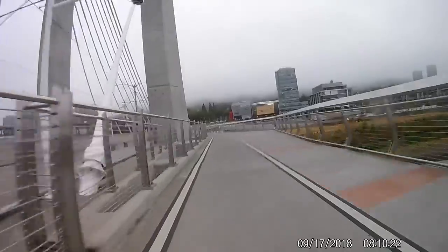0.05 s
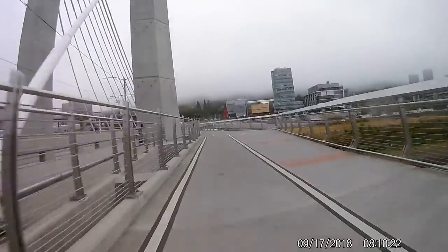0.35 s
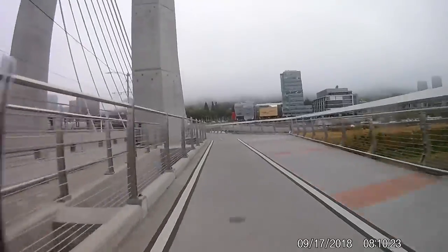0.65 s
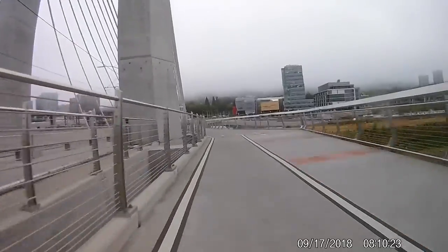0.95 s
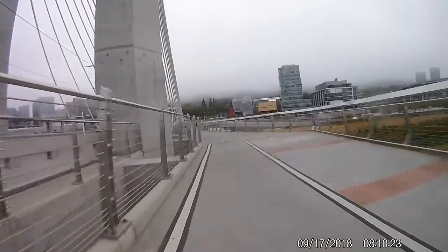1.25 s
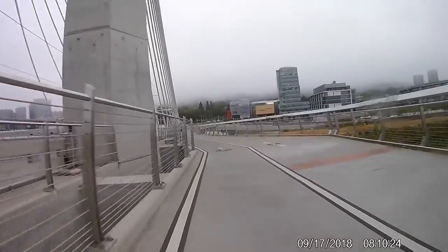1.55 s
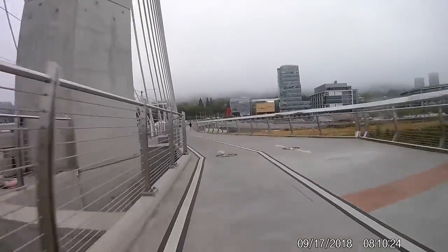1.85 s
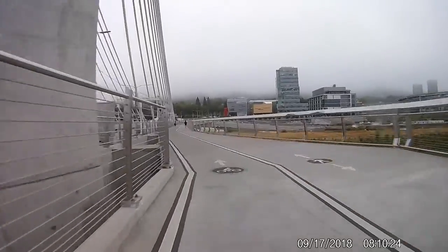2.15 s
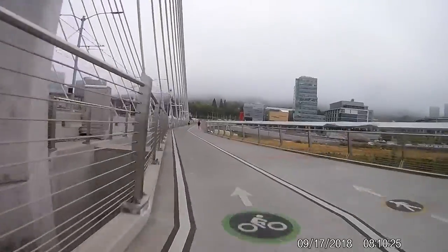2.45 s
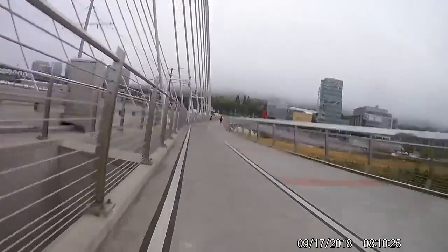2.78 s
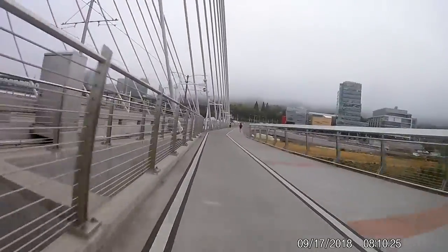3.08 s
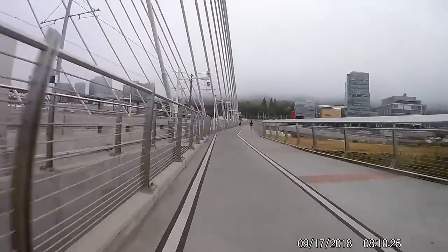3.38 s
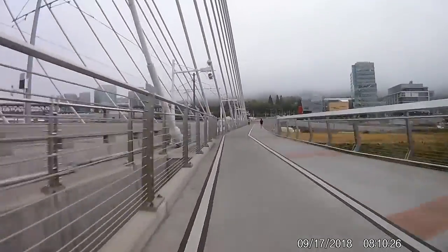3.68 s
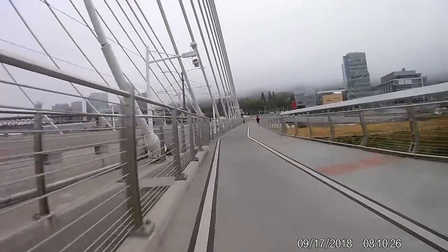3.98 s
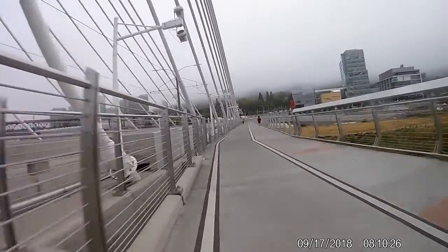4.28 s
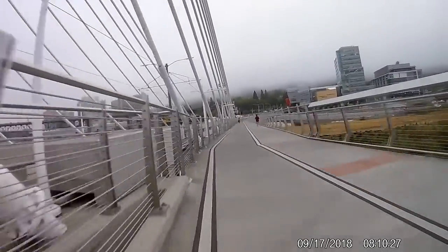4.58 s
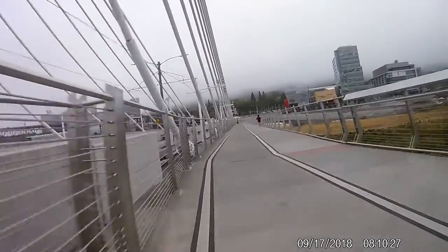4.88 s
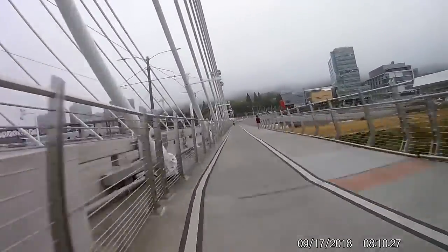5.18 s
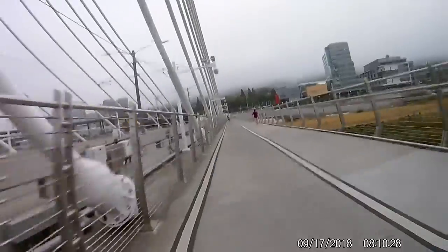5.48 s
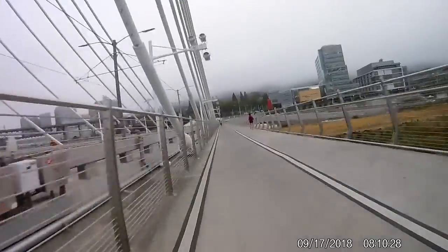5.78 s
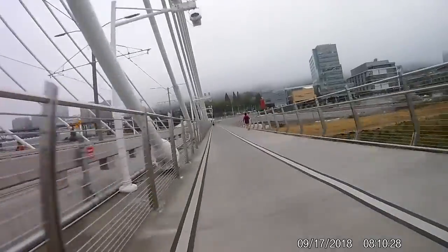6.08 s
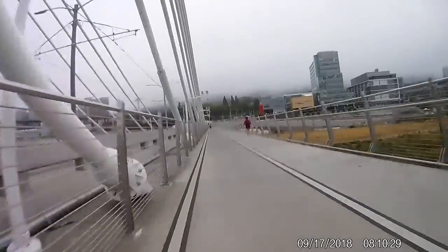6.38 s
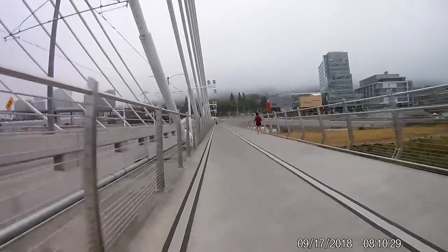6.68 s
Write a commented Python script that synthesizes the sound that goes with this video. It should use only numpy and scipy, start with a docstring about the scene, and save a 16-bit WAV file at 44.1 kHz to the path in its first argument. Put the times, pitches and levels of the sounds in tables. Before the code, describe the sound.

A bicycle rolls along a concrete path, its mounted camera clacking and thumping in bursts over a low tyre rumble.

```python
"""Clacks and thumps over tyre noise: a bicycle on a concrete path, with a camera in a plastic handlebar case.
Bumps sway the mount at about 37 Hz; on wide swings the camera hits its stops, a clack one way,
a thump the other. Tyre noise comes through frame and case; loose metal parts jingle.
Short gritty bursts and two brief high tones join in. The hardest blows overload the microphone."""
import sys
import numpy as np
from scipy import signal
from scipy.fft import rfft, irfft
from scipy.io import wavfile
from scipy.ndimage import uniform_filter1d

SR = 44100
rng = np.random.default_rng(int(sys.argv[2]) if len(sys.argv) > 2 else 0)


def unload_audio(sound):
    """Save the sound as a 16-bit wav file, at the path given as the first command line argument."""
    columns = np.transpose(np.atleast_2d(sound))
    # keep every value between -1 and 1, then stretch to whole-number steps
    steps = np.round(np.clip(columns, -1, 1) * 32767)
    wavfile.write(sys.argv[1], SR, steps.astype(np.int16))


N = 301644
TIME_S = np.arange(N) / SR
SWAY_HZ = 37.42
GRAZE_TICK_DB, GRAZE_CLACK_DB, GRAZE_THUMP_DB = -20, -17.5, -26.5
SPREAD_DB = 3  # blow-to-blow colour variation

# Levels are relative; each source adds its own offset.
# rolling (time [s], tyre noise [dB], tread drone [dB])
ROLL_LEVELS = [(0.0, -44, -47), (0.32, -45, -41.5), (2.23, -44, -47), (2.82, -43.5, -32.5), (4.1, -44, -43),
               (4.86, -42.5, -36.5), (5.35, -37.5, -41.5), (6.1, -42, -34), (6.51, -41.5, -36),
               (6.84, -40, -40.5)]
# tread drone (time [s], pitch [Hz])
TREAD_PITCH = [(0, 353.6), (2.6, 376.4), (3.6, 382.3), (4.6, 392), (5.2, 411), (6.84, 384.3)]
# tyre noise through the frame (frequency [Hz], level [dB])
TYRE_SPECTRUM = [(20, -19.5), (70, 8.5), (130, -7.5), (240, -1.5), (330, 4), (480, 6.5), (750, -5),
                 (1230, -8), (1650, -2.5), (1900, -16.5), (3000, -22.5), (4500, -38), (7500, -50.5),
                 (16000, -58)]
# frame resonances (centre [Hz], width [Hz], boost [dB])
FRAME_RESONANCES = [(296.5, 44, 10.2), (925, 58, 7.3), (1092, 74, 10.3), (1444, 230, 8.1), (2038, 110, 11),
                    (2784, 120, 7.7), (3770, 110, 3.6)]
# faint squeaks (time [s], level [dB])
SQUEAK_EVENTS = [(1.72, -29), (2.204, -30), (3.473, -28.5)]
# loose parts jolted (time [s], level [dB])
JINGLE_EVENTS = [(0.292, -39), (0.513, -42), (0.668, -39), (0.956, -47.5), (1.251, -44), (1.625, -48),
                 (1.723, -44), (2.336, -40), (2.693, -44), (3.389, -43.5), (4.254, -49), (5.206, -42)]
# loose parts ringing (frequency [Hz], level [dB], t60 [s])
METAL_MODES = [(2780, -5.5, .03), (3700, 3, 0.047)]
# brief high tones (time [s], pitch [Hz], overtone [Hz], level [dB])
HIGH_TONES = [(6.384, 4180, 6300, -36), (6.492, 4180, 6640, -35)]
# short gritty noise bursts (time [s], level [dB])
GRIT_BURSTS = [(1.914, -40), (2.876, -27), (3.484, -36), (5.208, -28.5), (5.937, -22.5), (6.389, -13),
               (6.491, -11)]
# case ringing (frequency [Hz], level [dB], t60 [s])
CASE_MODES = [(350, -19, 0.0095), (744, -2, 0.08), (822, 6, 0.041), (1140, -5.5, 0.039),
              (1436, -4.5, 0.037), (1738, -1, 0.034), (1730, -8.5, 0.056)]
# edge contact (frequency [Hz], level [dB])
TICK_SPECTRUM = [(200, -2.5), (900, 9), (1600, 8), (2500, -2.5), (3500, 2), (4300, -2.5), (5000, -14),
                 (6600, -17.5), (7900, -45.5), (9200, -26), (11500, -31.5), (13200, -50), (15500, -67.5)]
# camera seating (frequency [Hz], level [dB])
SEAT_SPECTRUM = [(40, -7), (250, -1), (450, -1.5), (750, 0.5), (1100, -10.5), (1700, -8.5), (2500, -31),
                 (5000, -68.5), (16000, -74.5)]
# full-weight landing (frequency [Hz], level [dB])
THUD_SPECTRUM = [(40, 4.5), (120, -4), (380, -4), (700, -2), (900, -3), (1300, -10.5), (2000, -23),
                 (3000, -48), (6000, -53), (16000, -88.5)]
# bumps that only rock the mount (time [s], sway [dB])
SWAY_BUMPS = [(0.3, -27), (0.84, -17.5), (1.48, -22.5), (1.921, -19), (2.4, -22), (3.0, -19), (3.12, -24),
              (3.44, -22.5), (3.89, -26), (4.081, -24), (4.56, -27), (4.67, -19.5), (6.148, -18),
              (6.288, -15.5), (6.68, -15), (6.799, -13.5)]
# jolts that throw the camera against its stops (time [s], first stop [hard/soft], blows [count],
# swing [Hz], sway [dB], tick [dB], clack [dB], thump [dB])
STOP_JOLTS = [(0.057, "hard", 3, 33.6, -16, -16.5, -11, 0),
              (0.2053, "hard", 1, 36.9, -19.5, -26.5, -13.5, -22),
              (0.546, "hard", 1, 35.35, -14, -25, -14, -13),
              (0.5762, "hard", 3, 33.4, -12.5, -16.5, -9, -13.5),
              (1.11, "hard", 5, 35, -18.5, -40, -28, -35),
              (1.3107, "hard", 3, 37.3, -13, -16.5, -11.5, -19),
              (2.2839, "soft", 2, 41.2, -19, -17, -8, -20.5),
              (2.7537, "hard", 1, 34.8, -17, -23.5, -18.5, -5),
              (2.8093, "hard", 1, 38.8, -12, -18.5, -12, -3),
              (2.8624, "hard", 1, 34.8, -17, -17.5, -12, -14),
              (2.9053, "soft", 2, 40.84, -13.5, -10.5, -5.5, -10),
              (3.544, "hard", 1, 37.2, -16.5, -37.5, -21, -17),
              (3.6223, "hard", 3, 35.05, -14, -17, -9.5, -18.5),
              (3.7297, "hard", 1, 36.3, -18, -34, -22, -14), (4.817, "hard", 1, 37.8, -15.5, -34, -26, -17),
              (4.895, "hard", 1, 39.25, -14, -16, -7.5, -8), (4.9937, "hard", 3, 35.07, -15, -14, -7.5, -8),
              (5.0984, "hard", 1, 34.1, -14.5, -18.5, -11, -15),
              (5.2584, "soft", 4, 32.9, -14, -15, -6, -1), (5.3404, "soft", 6, 36.33, -12.5, -10, -8.5, -2),
              (5.4728, "soft", 4, 36.47, -16, -12, -10, -1),
              (5.6064, "hard", 3, 33.02, -12.5, -12.5, -6.5, 4),
              (5.71, "hard", 5, 34.73, -13.5, -11.5, -7.5, 0),
              (5.8239, "hard", 3, 25.2, -19.5, -15.5, -10.5, -1.5),
              (5.9637, "hard", 1, 39, -15.5, -27, -16, -15),
              (6.3557, "hard", 3, 31.47, -13.5, -22, -7, -1.5),
              (6.4258, "soft", 2, 42, -13.5, -12, -8.5, -14),
              (6.4529, "soft", 4, 41.54, -13, -15, -3.5, -3.5),
              (6.518, "hard", 3, 36.34, -12.5, -19, -13.5, -9.5),
              (6.5953, "hard", 3, 34, -14.5, -16, -8.5, -0.5),
              (6.8134, "hard", 1, 33.1, -17, -23, -17.5, -20)]


def undb(db):
    """Decibels to gain."""
    return 10 ** (np.asarray(db) / 20)


def unit_rms(x):
    """Scale to rms 1."""
    return x / np.sqrt(np.mean(x ** 2))


def unit_peak(x):
    """Scale to peak 1."""
    return x / np.abs(x).max()


def curves(table):
    """Columns of a timed table, per sample."""
    times_s, *columns = np.transpose(table)
    return [np.interp(TIME_S, times_s, column) for column in columns]


def spectrum_db(spectrum, hz):
    """Spectrum table interpolated over log frequency."""
    points_hz, db = np.transpose(spectrum)
    return np.interp(np.log(hz + 1), np.log(points_hz), db)


def resonance(hz, centre_hz, width_hz):
    """Resonance curve, 1 at its centre."""
    return 1 / (1 + (2 * (hz - centre_hz) / width_hz) ** 2)


def decay(t60_s, size):
    """Exponential envelope, 60 dB down at t60."""
    return np.exp(-np.log(1000) * TIME_S[:size] / t60_s)


def noise(gain):
    """Noise shaped by a gain per frequency; rms 1."""
    return unit_rms(irfft(rfft(rng.standard_normal(N)) * gain, N))


def wander(rate_hz):
    """Smoothed random steps; rms 1."""
    hold = int(SR / rate_hz)
    steps = np.repeat(rng.standard_normal(N // hold + 1), hold)
    return unit_rms(uniform_filter1d(uniform_filter1d(steps, hold), hold)[:N])


def add(out, at_s, sound):
    """Mix a sound in at a time."""
    start = max(int(at_s * SR), 0)
    out[start:start + len(sound)] += sound[:max(N - start, 0)]


def drone(pitch_hz, hz, width_hz):
    """Narrow noise band on a moving pitch."""
    carrier = np.cos(2 * np.pi * np.cumsum(pitch_hz) / SR)
    return unit_rms(noise(resonance(hz, 0, width_hz)) * carrier)


def contact(spectrum, size=2048):
    """Click of peak 1; no two land alike, so its colour varies."""
    hz = np.fft.rfftfreq(size, 1 / SR)
    ripple = np.interp(hz, np.linspace(0, SR / 2, 36), rng.standard_normal(36))
    cepstrum = irfft(np.log(undb(spectrum_db(spectrum, hz) + SPREAD_DB * ripple)))
    cepstrum[1:size // 2] *= 2  # fold to minimum phase
    cepstrum[size // 2 + 1:] = 0
    return unit_peak(irfft(np.exp(rfft(cepstrum))))


def ring(modes, detune, size=6000):
    """Decaying modes, pitch and level redrawn per blow; peak 1."""
    out = np.zeros(size)
    for hz, db, t60_s in modes:
        pitch_draw, level_draw = rng.standard_normal(2)
        tone = np.sin(2 * np.pi * hz * (1 + detune * pitch_draw) * TIME_S[:size])
        out += undb(db + SPREAD_DB * level_draw) * tone * decay(t60_s, size)
    return unit_peak(out)


def shiver(t60_s, size=3000):
    """Dense upper modes of the plastic, decaying together; peak 1."""
    burst = rng.standard_normal(size) * decay(t60_s, size)
    return unit_peak(signal.fftconvolve(burst, contact(TICK_SPECTRUM)))


def tyres(hz, whirr_hz=1452, waver=0.012):
    """Rough concrete excites the frame; the tread drones with speed; a higher whirr wavers."""
    roll_db, tread_db = curves(ROLL_LEVELS)
    boost_db = sum(db * resonance(hz, mid_hz, width_hz) for mid_hz, width_hz, db in FRAME_RESONANCES)
    frame_gain = undb(spectrum_db(TYRE_SPECTRUM, hz) + boost_db)
    # each wheel meets its own patch of road
    road = sum(noise(frame_gain) * undb(2.03 * wander(18)) for wheel in ("front", "rear"))
    tread = drone(curves(TREAD_PITCH)[0] * (1 + waver * wander(5)), hz, width_hz=48)
    whirr = drone(whirr_hz * (1 + waver * wander(30)), hz, width_hz=105)
    whirr *= undb(2.2 * wander(24))
    return road * undb(roll_db + 4) + tread * undb(tread_db) + whirr * undb(roll_db)


def squeaks(pitch_hz=1378, length_s=0.028):
    """The bicycle squeaks faintly: a short tone swells and fades."""
    out = np.zeros(N)
    size = int(length_s * SR)
    squeak = np.hanning(size) * np.sin(2 * np.pi * pitch_hz * TIME_S[:size])
    for at_s, db in SQUEAK_EVENTS:
        add(out, at_s - length_s / 2, undb(db) * squeak)
    return out


def jingles():
    """A jolted metal part: tick and short tinkle."""
    out = np.zeros(N)
    for at_s, db in JINGLE_EVENTS:
        add(out, at_s, undb(db + 4) * shiver(t60_s=0.022))
        add(out, at_s, undb(db - 3) * ring(METAL_MODES, detune=0.0057))
    return out


def high_tones(length_s=0.0295, overtone_db=-21, waver=0.0056):
    """Brief wavering tones near 4.2 kHz, each with a faint overtone near 6.5 kHz."""
    out = np.zeros(N)
    size = int(length_s * SR)
    gate = signal.windows.tukey(size, 0.3)
    for at_s, pitch_hz, overtone_hz, db in HIGH_TONES:
        clock_s = np.cumsum(1 + waver * wander(260)[:size]) / SR
        tone = np.sin(2 * np.pi * pitch_hz * clock_s)
        overtone = undb(overtone_db) * np.sin(2 * np.pi * overtone_hz * clock_s)
        add(out, at_s, undb(db) * gate * (tone + overtone))
    return out


def grit_bursts(fade_s=0.0079, cutoff_hz=4800, size=2000):
    """Short, dull, gritty noise bursts that fade quickly."""
    out = np.zeros(N)
    lowpass = signal.butter(3, cutoff_hz, fs=SR, output="sos")
    for at_s, db in GRIT_BURSTS:
        spikes = rng.standard_normal(size) ** 3 * np.exp(-TIME_S[:size] / fade_s)
        ticks = signal.fftconvolve(spikes, contact(TICK_SPECTRUM))
        add(out, at_s, undb(db + 2.5) * unit_peak(signal.sosfilt(lowpass, ticks)))
    return out


def blows(grazes=0):
    """One blow per half swing, on alternate stops; optional grazes before and after each jolt."""
    for at_s, first_stop, count, swing_hz, _, *levels_db in STOP_JOLTS:
        for k in range(-grazes, count + grazes):
            soft = (k + (first_stop == "soft")) % 2
            grazing = not 0 <= k < count
            yield at_s + k / (2 * swing_hz), soft, grazing, *levels_db


def sway_reach(rise_db_per_s=329, fall_db_per_s=187):
    """Sway envelope: builds fast, holds while the camera knocks, dies away."""
    swells = [(at_s, 0, db) for at_s, db in SWAY_BUMPS]
    swells += [(at_s, (count - 1) / (2 * hz), db) for at_s, _, count, hz, db, *_ in STOP_JOLTS]
    reach_db = np.full(N, -np.inf)
    for at_s, hold_s, db in swells:
        fade_db = np.maximum(rise_db_per_s * (at_s - TIME_S), fall_db_per_s * (TIME_S - at_s - hold_s))
        reach_db = np.maximum(reach_db, db - np.maximum(fade_db, 0))
    return undb(reach_db)


def sway_phase_rad():
    """Free swing between blows: clacks on whole cycles, thumps on half cycles."""
    anchors = [(at_s, soft / 2) for at_s, soft, *_ in blows()] + [(0, 0), (N / SR, 0)]
    times_s, side = np.transpose(sorted(anchors))
    cycles = np.round(np.diff(times_s) * SWAY_HZ - np.diff(side)) + np.diff(side)
    return 2 * np.pi * np.interp(TIME_S, times_s, np.append(0, np.cumsum(cycles)))


def mount(hz, slips_per_s=900):
    """Lopsided sway pumps the air in the case; the joint rubs once per swing and gives tiny ticks."""
    reach = sway_reach()
    phase_rad = sway_phase_rad() + 0.41 + 0.28 * wander(40)
    harmonics = undb(-14) * np.cos(2 * phase_rad + 0.77) + undb(-16.5) * np.sin(3 * phase_rad + 1.22)
    sway = np.sin(phase_rad) + np.minimum(reach / 0.12, 1) * harmonics
    rub = noise(undb(spectrum_db(SEAT_SPECTRUM, hz))) * (0.5 + 0.5 * np.sin(phase_rad)) ** 2
    slips = (rng.random(N) < slips_per_s / SR) * rng.standard_normal(N) ** 3
    grit = unit_rms(irfft(rfft(slips) * undb(spectrum_db(TICK_SPECTRUM, hz)), N))
    tremble = noise(resonance(hz, SWAY_HZ - 2, width_hz=29.5) ** 2)  # from the road's grain
    return reach * (1.59 * sway + undb(-11) * rub + undb(-37) * grit) + undb(-31) * tremble


def thumps(tip_s=0.0011, edge_db=-15):
    """Soft stop: an edge ticks, the camera tips over it and lands with its full weight."""
    out = np.zeros(N)
    for at_s, soft, grazing, _, _, thump_db in blows(grazes=2):
        if not soft:
            continue
        tick_db = thump_db + edge_db + grazing * GRAZE_TICK_DB
        thump_db += grazing * GRAZE_THUMP_DB
        seated_s = at_s + tip_s * rng.uniform(0.42, 1.3)
        landed_s = seated_s + 0.00066
        add(out, at_s, undb(tick_db + 6) * contact(TICK_SPECTRUM))
        add(out, at_s, undb(tick_db - 3) * shiver(t60_s=0.02))
        add(out, seated_s, undb(thump_db + 2) * contact(SEAT_SPECTRUM))
        add(out, landed_s, -undb(thump_db + 8) * contact(THUD_SPECTRUM))
        add(out, landed_s, -undb(thump_db - 16) * ring(CASE_MODES, detune=0.05))
    return out


def clacks(recoil_s=0.0075):
    """Hard stop: an edge chatters, the camera seats and recoils, the case rings."""
    out = np.zeros(N)
    for at_s, soft, grazing, tick_db, clack_db, _ in blows(grazes=2):
        if soft:
            continue
        tick_db += grazing * GRAZE_TICK_DB
        clack_db += grazing * GRAZE_CLACK_DB
        chatter_s = at_s + 0.0007 + 0.0003 * rng.uniform(-1.01, 1)
        seated_s = at_s + 0.001636 + 0.00039 * rng.uniform(-1.01, 1)
        add(out, at_s - 0.002, undb(tick_db - 24.5) * shiver(t60_s=0.018))  # slide before the strike
        add(out, at_s, undb(tick_db + 5) * contact(TICK_SPECTRUM))
        add(out, chatter_s, undb(tick_db + 7) * contact(TICK_SPECTRUM))
        add(out, at_s, undb(tick_db - 4) * shiver(t60_s=0.024))
        add(out, seated_s, -undb(clack_db + 3.5) * contact(SEAT_SPECTRUM))
        add(out, seated_s, undb(clack_db - 10) * np.hanning(int(recoil_s * SR)))
        add(out, seated_s, -undb(clack_db - 5.5) * ring(CASE_MODES, detune=0.036))
    return out


def scene(hiss_db=-82):
    """Rattle, sway, tyres and faint hiss at one microphone."""
    hz = np.fft.rfftfreq(N, 1 / SR)
    rattle = clacks() + thumps() + grit_bursts() + high_tones() + jingles() + squeaks()
    return (mount(hz) + rattle + tyres(hz) + undb(hiss_db) * rng.standard_normal(N))[None]


def record(dry, cutoff_hz=16200):
    """Microphone overload: soft clip, earlier on positive peaks, then lowpass."""
    ceiling = np.where(dry > 0, 0.85, 1)
    clipped = dry / (1 + (dry / ceiling) ** 6) ** (1 / 6)
    return signal.sosfilt(signal.ellip(8, 0.2, 70, cutoff_hz, fs=SR, output="sos"), clipped)


dry = scene()
out = record(dry)
unload_audio(out)
```